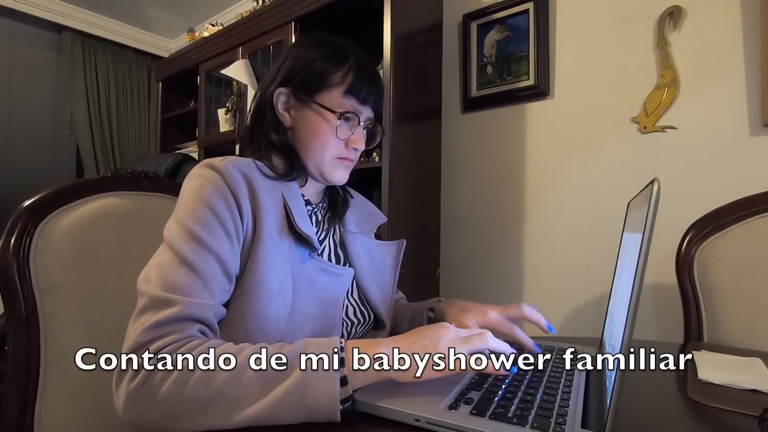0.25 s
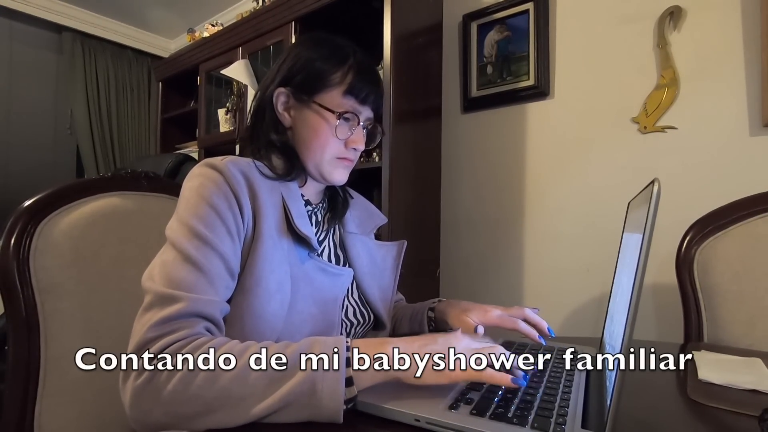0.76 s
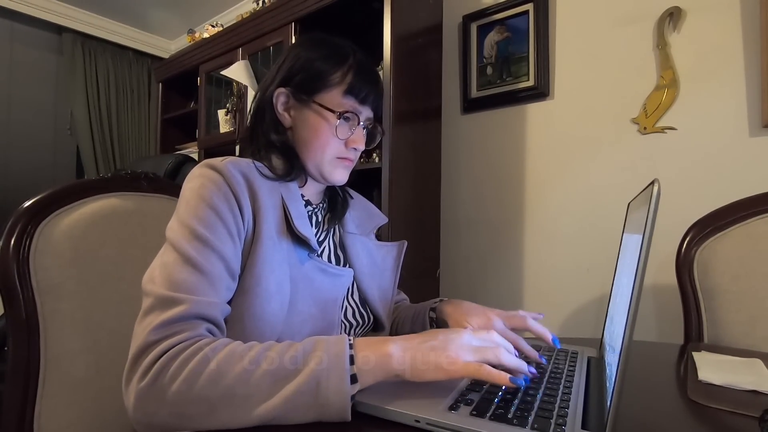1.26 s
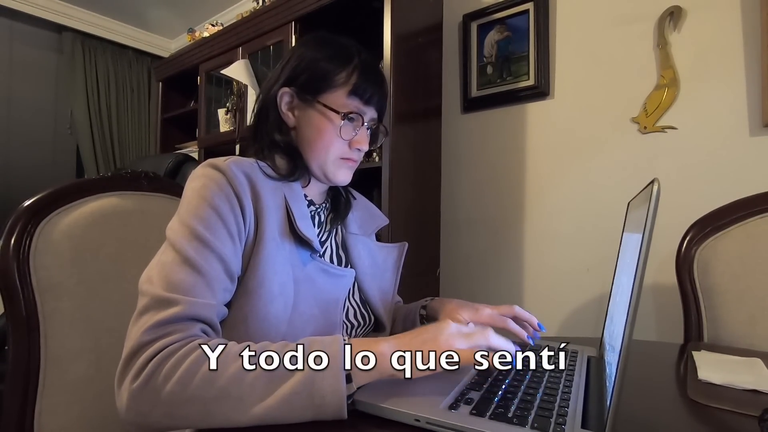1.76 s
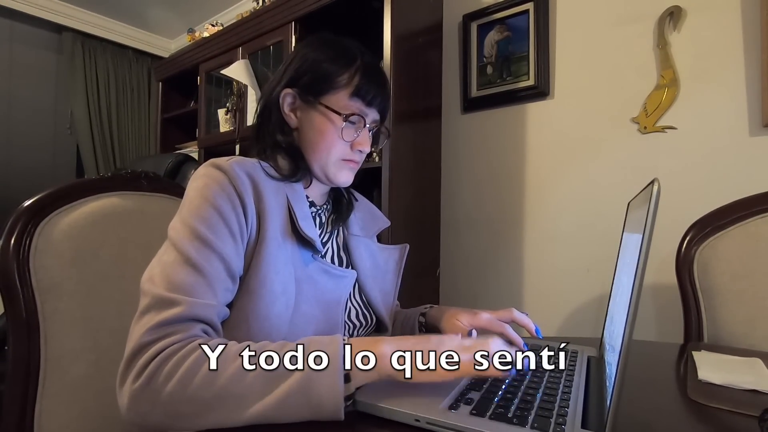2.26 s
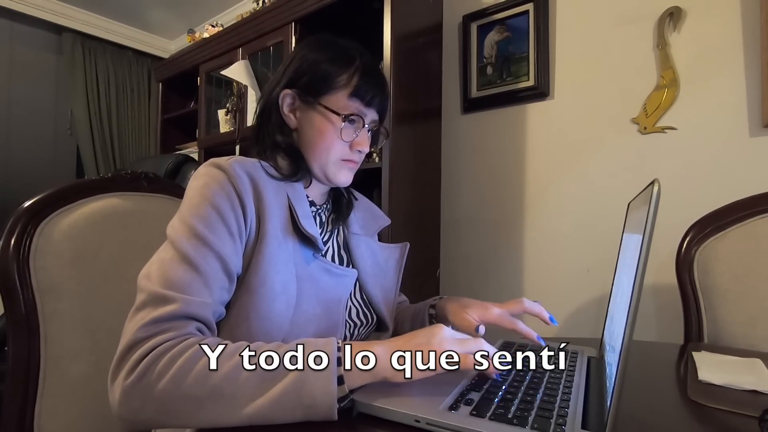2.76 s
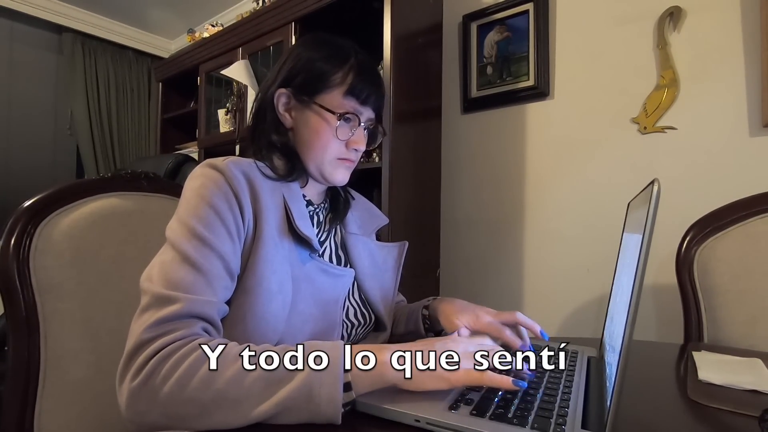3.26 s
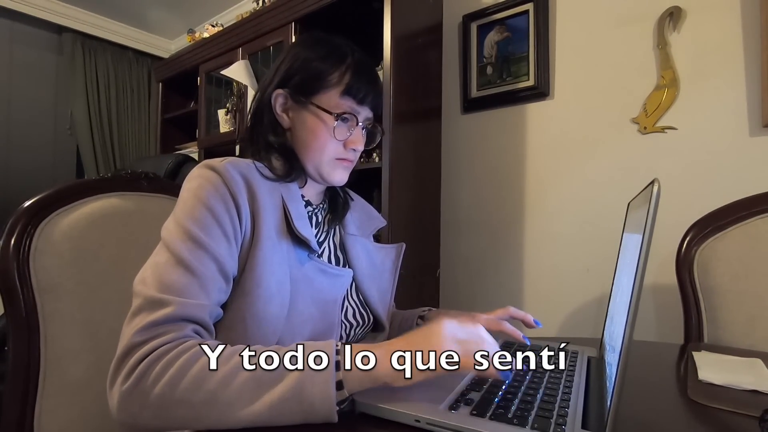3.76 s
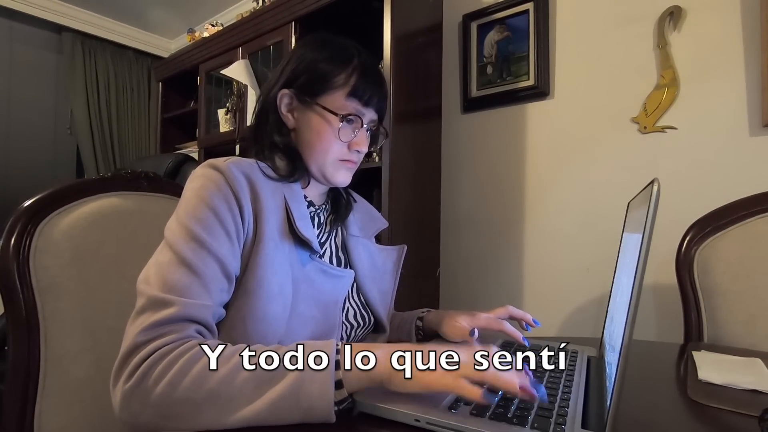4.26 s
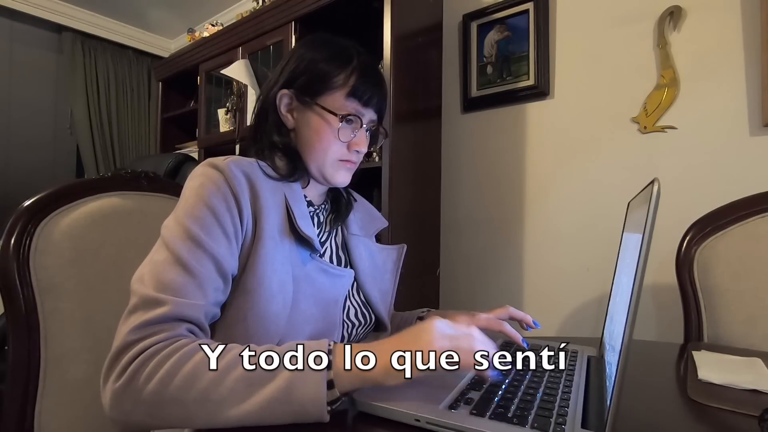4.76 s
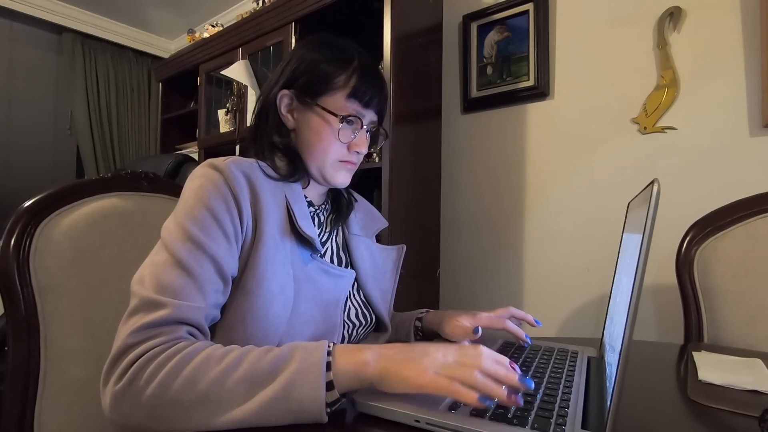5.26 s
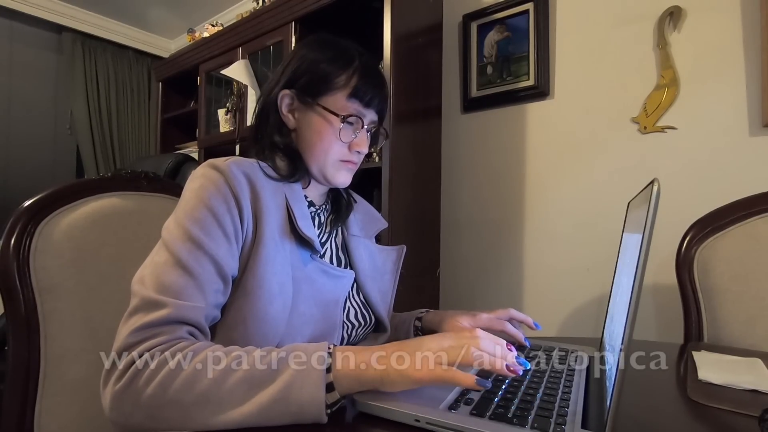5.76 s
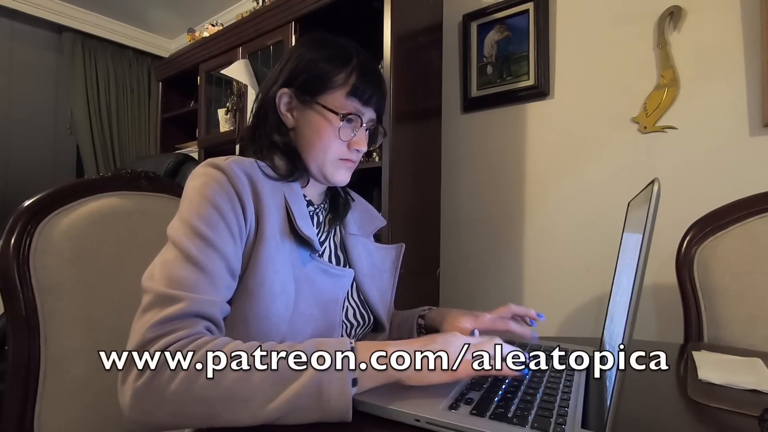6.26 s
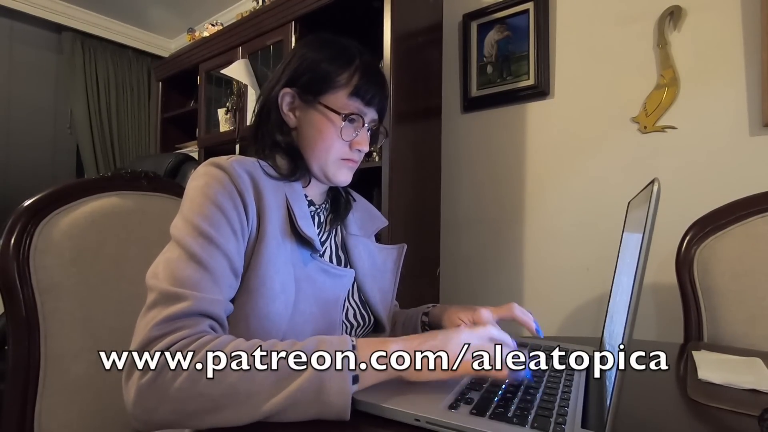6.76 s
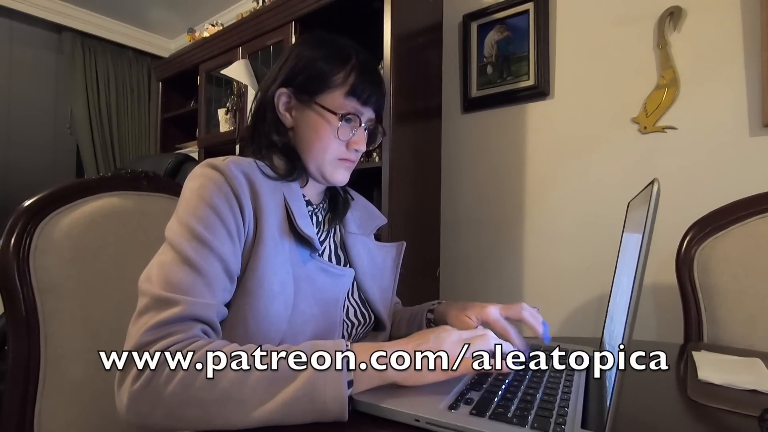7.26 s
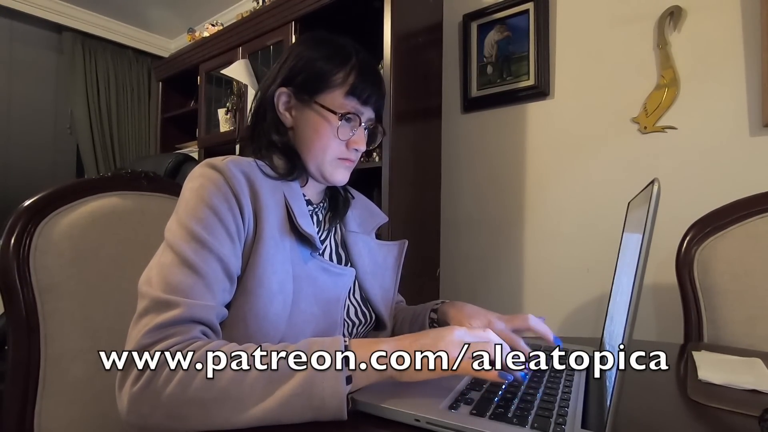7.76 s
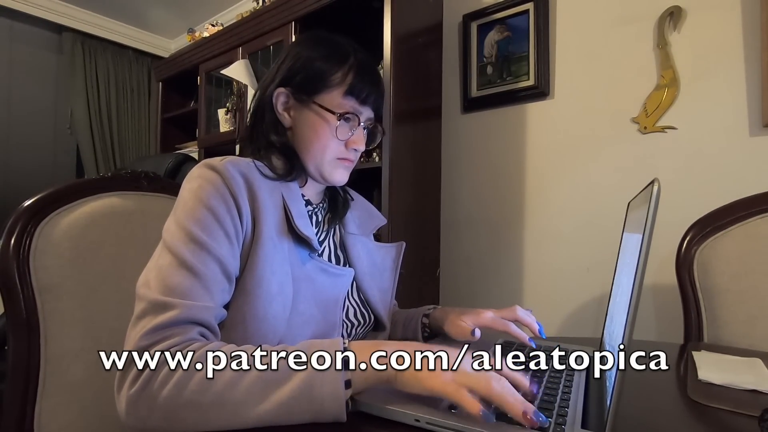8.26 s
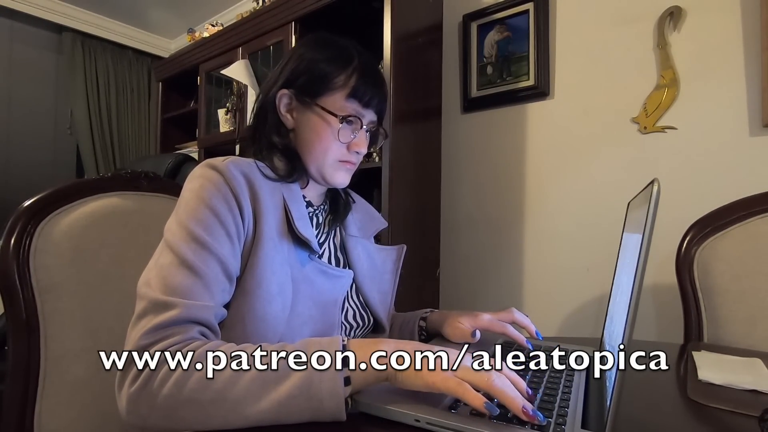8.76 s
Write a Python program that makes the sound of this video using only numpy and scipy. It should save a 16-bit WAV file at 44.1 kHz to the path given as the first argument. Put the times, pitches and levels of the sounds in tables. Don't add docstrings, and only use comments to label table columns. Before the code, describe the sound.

Quick, light typing on a laptop in a quiet furnished room, crisp key ticks with soft table thumps and a faint low hum.

```python
import sys
import numpy as np
from scipy import signal
from scipy.fft import rfft, irfft, next_fast_len
from scipy.io import wavfile
from scipy.ndimage import uniform_filter1d

SR = 44100
rng = np.random.default_rng(int(sys.argv[2]) if len(sys.argv) > 2 else 0)


def magnitude_from_level(level_db):
    exponent = np.asarray(level_db, float) / 20
    return 10 ** exponent


def unload_wav(signal):
    wavfile.write(
        sys.argv[1],
        SR,
        np.round(np.clip(np.atleast_2d(signal).T, -1, 1) * 32767).astype(np.int16),
    )


N = 397341

# (frequency [Hz], width [Hz], level [dB])
TICK = [(6681, 3300, -1.5), (8300, 1600, 17.5), (9300, 2070, 2), (11980, 1900, 6.5)]
# (frequency [Hz], width [Hz], level [dB])
CAP = [(2190, 700, -15), (3050, 1200, -9), (4760, 2180, -11), (4900, 1700, -8.5), (5640, 1870, -2.5)]
# (frequency [Hz], left-right likeness [-1 to 1])
SAME = [(100, 0.43), (500, 0.16), (2000, 0.17), (8000, 0.18)]


def evened(x):
    return x / np.sqrt(np.mean(x ** 2) + 1e-20)


def read(points, hz):
    f, value = np.transpose(points)
    return np.interp(np.log(hz + 1), np.log(f + 1), value)


def add(mix, s, sound):
    part = mix[..., round(s * SR):][..., :sound.shape[-1]]
    part += sound[..., :part.shape[-1]]


def strike(modes, chance, blow_s, detune, spread_db, size=3000):
    t = np.arange(size) / SR
    hz, width, db = np.transpose(modes)[:, :, None]
    louder, sharper = chance[:2, :len(modes), None]
    level = magnitude_from_level(db + spread_db * louder) * np.exp(-np.pi * width * t)
    ring = (level * np.sin(2 * np.pi * hz * (1 + detune * sharper) * t)).sum(0)
    ring = ring * (1 - np.exp(-t / blow_s))
    return ring / abs(ring).max()


def noise(spectrum, same, patchy_db, size):
    frames, hz = 4 * N // size + 5, np.fft.rfftfreq(size, 1 / SR)
    a, b, c, d, patches = rng.standard_normal((frames, len(hz), 5)).T
    patches = uniform_filter1d(patches, size=8, axis=0)
    patches = evened(uniform_filter1d(patches, size=10, axis=1))
    same = np.clip(read(same, hz), -1, 1)[:, None]
    left, other = a + 1j * b, c + 1j * d
    z = np.array([left, same * left + np.sqrt(1 - same ** 2) * other])
    z = z * magnitude_from_level(read(spectrum, hz)[:, None] + patchy_db * patches)
    return evened(signal.istft(z, nperseg=size, noverlap=3 * size // 4)[1][:, :N])


def strokes():
    # (time [s], tick peak [dB], case knock re tick [dB])
    crisp = [(0.4129, -29, -30), (0.8286, -32, -11), (.9532, -32, -22.5), (1.4307, -36.5, -38),
             (1.6048, -38, -17.5), (2.3178, -33.5, -10.5), (2.5332, -31.5, -18), (2.7601, -37.5, -8.5),
             (3.2333, -29.5, -22), (3.3778, -31.5, -19), (6.3576, -34, -22.5), (6.6026, -34.5, -20.5),
             (6.7981, -35, -23.5), (7.0326, -34.5, -24), (7.246, -32, -29), (7.4063, -36, -23),
             (7.4546, -28.5, -27), (7.6044, -31.5, -27.5), (7.6757, -30, -21.5), (7.822, -40, -16.5)]
    # (tick [Hz], cap [Hz], case [Hz], cap rattle re tick [dB])
    crisp_voice = [(7600, 5390, 1270, -19), (8100, 5280, 850, -26), (9000, 4980, 837, -26),
                   (8400, 5880, 900, -26), (9000, 5290, 845, -24), (8600, 4160, 869, -20),
                   (8300, 5490, 991, -22), (7400, 4530, 900, -18), (8100, 5510, 1210, -28),
                   (8700, 5870, 966, -28), (8200, 4980, 880, -24), (8400, 5250, 756, -28),
                   (7700, 5520, 980, -26), (7600, 4780, 883, -28), (7800, 4840, 875, -28),
                   (7900, 5670, 1380, -26), (8800, 5050, 1110, -22), (7300, 5960, 937, -22),
                   (7200, 4910, 980, -28), (7700, 5190, 1290, -26)]
    # (time [s], tick peak [dB], cap rattle re tick [dB], case knock re tick [dB])
    loose = [(.001, -42, -16, -10), (.1211, -41, -11.5, -8.5), (0.1888, -35, -20.5, -32),
             (0.3447, -36.5, -22, -24.5), (1.26, -40.5, -16.5, -20), (1.731, -37, -19, -12.5),
             (2.6743, -33.5, -19, -14.5), (2.873, -34, -20, -20), (2.9236, -33, -8.5, -15),
             (3.0147, -42, -6, -16), (3.0604, -40, -10.5, -8), (3.5096, -34.5, -20.5, -20.5),
             (3.9007, -41.5, -16.5, -12), (4.0884, -33, -10, -12.5), (5.1124, -33.5, -10, -16),
             (5.1888, -43.5, -9.5, -10), (5.2953, -39, -19.5, -29), (5.9669, -39, -19.5, -27),
             (6.4413, -33, -19.5, -25.5), (6.5126, -40.5, -12, -12), (7.1643, -28.5, -16.5, -20.5),
             (7.5414, -40.5, -10, -12)]
    # (tick [Hz], cap [Hz], case [Hz])
    loose_voice = [(7700, 5860, 1090), (8000, 4600, 985), (7980, 3980, 999), (9160, 4920, 845),
                   (7930, 5760, 869), (8830, 5250, 834), (7200, 4520, 900), (8800, 4470, 1380),
                   (7000, 5400, 1560), (7230, 5300, 1200), (8020, 3200, 1430), (7960, 5820, 867),
                   (7680, 4640, 1290), (8200, 4900, 982), (7370, 5380, 1150), (7450, 5640, 845),
                   (7000, 5610, 832), (8280, 5170, 1610), (7490, 5390, 1340), (8600, 4690, 848),
                   (8800, 4800, 988), (7130, 4830, 856)]
    # (time [s], tick peak [dB], case knock re tick [dB], table thump re tick [dB])
    bar = [
        (0.53, -44.5, 1, 7),
        (2.136, -47.5, -3.5, 7),
        (4.3683, -45.5, -7.5, -3.5),
        (5.458, -38, -4.5, 3.5),
        (6.1446, -52, 6, 4),
        (8.316, -53, 0, 11),
    ]
    # (tick [Hz], cap [Hz], case [Hz], cap rattle re tick [dB])
    bar_voice = [(7400, 4800, 860, -8), (7910, 3800, 1130, -9), (7780, 5060, 1090, -15),
                 (7400, 4510, 1090, -6), (8590, 5400, 1380, -8), (8000, 3360, 1470, -5)]
    # (time [s], tick peak [dB], cap rattle re tick [dB], case knock re tick [dB])
    light = [(0.0923, -48, -12.5, -24), (0.4871, -47, -11, -10), (.6589, -51, -16, -9),
             (1.039, -56.5, -12, -1.5), (1.1733, -54.5, -8.5, -11), (1.48, -53.5, -39, -30),
             (2.4017, -58, -16.5, -15), (2.6081, -52, -21, -6.5), (2.7984, -47, -14.5, -13),
             (3.139, -52.5, -15.5, -5.5), (3.2007, -57.5, -14, 7.5), (3.6254, -52.5, -16, -8.5),
             (3.6773, -61, -32, -3.5), (3.764, -65, -12.5, -16.5), (4.1864, -46.5, -11, -10),
             (4.6174, -63, -8.5, -5), (4.7246, -59, -13.5, -13), (4.7459, -64, -10.5, -10),
             (4.8579, -45.5, -14, -21), (5.3213, -54, -2.5, -2), (6.231, -51.5, -11, -11),
             (6.6988, -58, -8, 5), (6.885, -56, -22, -10), (6.921, -53.5, -10, 6),
             (7.3327, -56.5, -17, -22), (7.9462, -51.5, -42, -18.5), (8.0672, -64.5, -14, -11.5)]
    crisp_thump_db, loose_thump_db, light_thump_db = 0.2, -0.35, 3
    rows = [(s, db, *voice, case, case + crisp_thump_db)
            for (s, db, case), voice in zip(crisp, crisp_voice)]
    rows += [(s, db, *voice, cap, case, case + loose_thump_db)
             for (s, db, cap, case), voice in zip(loose, loose_voice)]
    rows += [(s, db, *voice, case, table) for (s, db, case, table), voice in zip(bar, bar_voice)]
    scatter = np.exp(.1 * rng.standard_normal((len(light), 2)))
    rows += [(s, db, 7600 * a, 4900 * b, 0, cap, case, case + light_thump_db)
             for (s, db, cap, case), (a, b) in zip(light, scatter)]
    return rows


def clicks(rows):
    cap_ring_db, cap_ring_width_hz = -5, 1100
    rattle_db, rattle_s = -11, .007
    landing_s = .0011
    air, blurred = np.zeros((2, N))
    chance = rng.standard_normal((len(rows), 2, 2, 12))
    grit, sparse = rng.standard_normal((len(rows), 2, 1600)), rng.random((len(rows), 2, 1600))
    t = (np.arange(1600) - 400) / SR
    snap = magnitude_from_level(-12) * np.exp(-abs(t) / .001)
    for (s, db, hz, cap_hz, _, cap_db, _, _), c, g, u in zip(rows, chance, grit, sparse):
        tick_modes = TICK * np.array([hz / TICK[1][0], 1, 1])
        tick = strike(tick_modes, c[0], .00005, 0.003, 1.9, size=200)
        cap_modes = CAP + [(cap_hz, cap_ring_width_hz, cap_ring_db)]
        cap = magnitude_from_level(cap_db + 7.5) * strike(cap_modes, c[1], .0001, 0.03, 1.5, size=200)
        soft = np.clip((-39.0 - db) / 9, 0, 1)
        going_down = magnitude_from_level(-33 + 12 * soft) * np.exp(t / 0.011)
        settling = magnitude_from_level(-14.5) * np.exp(-t / 0.0038) + soft * magnitude_from_level(-11) * np.exp(-t / .016)
        chatter = (snap + np.where(t < 0, going_down, settling)) * g * (u < .08)
        chatter[1] += (t > 0) * magnitude_from_level(rattle_db) * np.exp(-t / rattle_s) * g[1] * (u[1] > .85)
        chatter[:, np.argmin(abs(t))] = (1 - .6 * soft) * np.array([1, .6])
        click = np.convolve(tick, chatter[0]) + np.convolve(cap, chatter[1])
        start = s + landing_s + t[0]
        add(air, max(start, 0), magnitude_from_level(db + 1.0) * click[round(max(-start, 0) * SR):])
        weight = np.linalg.norm(chatter, axis=1)
        add(blurred, s + landing_s, magnitude_from_level(db - .2) * (weight[0] * tick + weight[1] * cap))
    return air, blurred


def blows(rows):
    # (frequency [Hz], width [Hz], level [dB])
    case_modes = [(657, 93, -7), (743.41, 70, -8), (850, 67, -2), (916, 59.5, -2.5), (1014.3, 70.4, 0),
                  (1097, 73, -3), (1251, 74.69, -4), (1483.1, 85, -7), (1534, 80, -9), (1960, 450, -13)]
    # (frequency [Hz], width [Hz], level [dB])
    table_modes = [(98, 30, -5), (127, 44, -7), (195.76, 25.3, 3), (283, 49, 0.5), (332.3, 16.7, -4.5),
                   (469.03, 200, 2), (600, 280, -17.5)]
    # (frequency [Hz], width [Hz], level [dB])
    slap_modes = [(600, 300, -5), (1300, 700, -1), (2000, 800, 0), (2900, 1200, 0)]
    # (time [s], case knock peak [dB],
    # table thump re knock [dB])
    dull = [(0.057, -72, 7), (1.282, -64, 12), (1.779, -63, -1), (2.029, -87, 17.5), (2.369, -63, -2),
            (4.12, -58, -1), (4.519, -76, 12), (4.563, -64, 6), (4.659, -68, -3), (4.882, -54, -12.5),
            (5.489, -56.5, 5), (5.739, -83, 5.5), (5.858, -78.5, 4), (5.994, -62, -5), (6.82, -64, -3),
            (.24, -62, -5), (2.768, -52, -10), (6.169, -60, 17.5), (6.252, -50.5, -7), (6.748, -69.5, 20.5),
            (7.276, -56, -1), (7.746, -64, 4.5), (8.538, -79, 6),
            (.533, -45, -2),
        (2.136, -59.5, 10.5),
        (4.368, -54.5, 9.5),
        (5.114, -52, 7),
        (8.316, -60.5, 3.5),
    ]
    knock_hz, knock_octaves, knock_wander = 890, .4, .4
    knocks, thumps = np.zeros((2, N))
    hits = [(s, db + case_db, db + table_db, case_hz) for s, db, _, _, case_hz, _, case_db, table_db in rows]
    hits += [(s, db, db + table_db, 0) for s, db, table_db in dull]
    chance = rng.standard_normal((len(hits), 3, 2, 12))
    for (s, case_db, table_db, case_hz), c in zip(hits, chance):
        lightness = np.clip((-44.5 - case_db) / 8, 0, 1)
        centre = case_hz or knock_hz * np.exp(knock_wander * abs(c[0, 0, -1]) * lightness)
        rung = [(f, w, d - min(6 * (np.log2(f / centre) / knock_octaves) ** 2, 8)) for f, w, d in case_modes]
        add(knocks, s + .002, magnitude_from_level(case_db + 1.0) * strike(rung, c[1], 0.0035, .015, 4, size=1600))
        add(knocks, s + .0011, magnitude_from_level(case_db - 2.5) * strike(slap_modes, c[0], .0002, .12, 2.5, size=300))
        thump = strike(table_modes, c[2], 0.001, 0.044, 2.1, size=1600)
        add(thumps, s, magnitude_from_level(1.4 * (table_db + 46.0) - 46.5) * thump)
    return knocks, thumps


def room(x, blurred):
    # (left [s], right [s])
    echo_s = [(.0070, .0069), (.0078, .0080), (.0093, .0094), (.0108, .0112), (.0163, .0167), (.0215, .022),
              (.031, .029)]
    # (left [dB], right [dB])
    echo_db = [(-7.5, -11), (-21.5, -1.5), (-5.5, -15.5), (-14.5, -16.5), (-44.5, -10.5), (-11.5, -24.5),
               (-18, -17)]
    # (frequency [Hz], time [s])
    fade = [(300, 0.37), (900, 0.34), (2500, 0.33), (6000, 0.26), (12000, 0.29)]
    early = np.zeros((2, 1500))
    for (left_s, right_s), db in zip(echo_s, echo_db):
        early[[0, 1], [round(left_s * SR), round(right_s * SR)]] = magnitude_from_level(np.array(db) + 2.5)
    out = signal.oaconvolve(x[None], early, axes=1)[:, :N]
    size = SR // 3
    slots = np.arange(300, size - 20, 12)
    for turn in range(2):
        taps = np.zeros((2, size))
        at = slots + rng.integers(0, 12, (2, len(slots)))
        np.put_along_axis(taps, at, rng.choice([-1., 1.], at.shape), 1)
        taps[1] = 0.26 * taps[0] + 0.85 * taps[1]
        hz, t, z = signal.stft(taps, SR, nperseg=128)
        decay = magnitude_from_level(-60 * t / read(fade, hz)[:, None])
        onset = np.clip((t - .008) / 0.0093, 0, 1)
        tail = signal.istft(z * decay * onset, SR, nperseg=128)[1]
        tail = tail / np.linalg.norm(tail[0])
        window = np.cos(np.pi * (np.arange(N) / SR * 3 + turn / 2))
        out += magnitude_from_level(-1.5) * signal.oaconvolve((blurred * window)[None], tail, axes=1)[:, :N]
    return out


def effort():
    # (time [s], level [dB])
    trembling = [(0, -42.5), (1.33, -44.5), (1.82, -44.5), (1.96, -74), (2.3, -72), (2.55, -43.5),
                 (3.45, -47.5), (4.15, -46.5), (4.4, -59), (5.09, -60.5), (5.2, -46.5), (5.8, -54),
                 (6.4, -47), (6.7, -54), (7.05, -42), (7.8, -43), (8.15, -53), (8.3, -77)]
    return np.interp(np.arange(N) / SR, *np.transpose(trembling))


def shake():
    # (peak time [s], level [dB], sway frequency [Hz], settling time per 20 dB [s])
    sways = [(.012, -38.4, 41.5, .39), (.602, -40.4, 55.5, .39), (1.062, -35, 56, .41),
             (1.782, -41.4, 50.5, .09), (2.202, -28.4, 47.5, .052), (2.372, -38.4, 38.5, .052),
             (2.622, -39.4, 36.5, .44), (3.102, -35.4, 44.5, .26), (3.302, -38.4, 68.5, .31),
             (3.542, -42.4, 63.5, .09), (3.682, -39.5, 48.2, .26), (4.202, -42.4, 37.5, .16),
             (4.422, -29.4, 46.5, .082), (4.672, -34.5, 48.4, .14), (5.342, -40.4, 60.5, 0),
             (5.512, -27.4, 57, .16), (6.022, -35, 66.5, .19), (6.192, -32.4, 66.4, 0.19),
             (6.502, -41.4, 62.5, .16), (6.802, -43.4, 55.4, .31), (6.962, -36.4, 64.4, .062),
             (8.372, -29.4, 52.5, .072), (8.562, -49.4, 50.4, .16)]
    # (frequency [Hz], level [dB per Hz])
    jolt_spectrum = [(12, -13.5), (25, 0), (50, 0.5), (75, -4.5), (95, -19), (140, -16), (300, -48),
                     (600, -97), (1000, -120)]
    rise_s, hold_s, gain_db = 0.052, .05, -3
    trembling = magnitude_from_level(2 * effort())
    t = np.arange(0, N, 32) / SR
    power = trembling[::32]
    for s, db, hz, settle_s in sways:
        rising, settling = (s - t) / rise_s, (t - s - hold_s) / min(settle_s, .5)
        fall = np.maximum(np.maximum(rising, settling), 0)
        power = power + magnitude_from_level(2 * (db + gain_db - 20 * fall))
    full_t = np.arange(N) / SR
    power = np.interp(full_t, t, power)
    db = 10 * np.log10(power)
    hz = np.interp(full_t, *np.transpose(sways)[::2])
    clean = np.clip((db + 50) / 15 - .25 * trembling / power, .05, .95)
    turn = 2 * np.pi * np.cumsum(hz) / SR
    sway = np.sqrt(2) * np.sin([turn - 1.9, turn]) * [[.7], [1]]
    jolts = noise(jolt_spectrum, [(20, 0.31), (200, 0.092)], 2.5, size=2048)
    return magnitude_from_level(db) * magnitude_from_level([[-10.3], [5]]) * (np.sqrt(clean) * sway + np.sqrt(1 - clean) * jolts)


def hum():
    # (frequency [Hz], level [dB per Hz])
    hum_spectrum = [(40, -23), (105, -23.5), (150, 6.5), (200, -3), (260, -13), (400, -20.5), (550, -28),
                    (1000, -31.5), (2200, -42.5), (5000, -46.5), (9000, -50), (11000, -60), (16000, -84)]
    # (frequency [Hz], level [dB rms])
    fan = [(625, -84), (685, -88), (1510, -93), (1600, -92)]
    follows, lag_s, fan_duck = 0.059, 0.54, .2
    t = np.arange(N) / SR
    swing = uniform_filter1d(effort(), round(lag_s * SR)) + 70
    tones = np.zeros(N)
    for hz, db in fan:
        waver = 4.5 * np.cumsum(rng.standard_normal(N)) / np.sqrt(SR)
        tones += magnitude_from_level(db) * np.sin(2 * np.pi * hz * t + waver)
    rumble = magnitude_from_level(-59 + follows * swing) * magnitude_from_level([[-1.5], [1.5]]) * noise(hum_spectrum, SAME, 2.8, size=1024)
    return rumble + np.sqrt(2) * tones * magnitude_from_level(-fan_duck * swing)


def street():
    # (frequency [Hz], level [dB per Hz])
    street_spectrum = [(300, -26.5), (500, -35), (800, 8), (1200, -1), (1700, 1.5), (2200, -9), (3500, -37),
                       (6000, -75)]
    # (time [s], level [dB])
    swells = [
        (0.0, -70),
        (0.6, -82.5),
        (1.88, -88.5),
        (3.09, -68.5),
        (3.94, -90),
        (4.52, -80),
        (5.9, -82),
        (6.3, -74),
        (9.01, -79.5),
    ]
    s, db = np.transpose(swells)
    return magnitude_from_level(np.interp(np.arange(N) / SR, s, db) + 2.5) * noise(street_spectrum, SAME, 3.4, size=512)


def rustles():
    # (middle time [s], length [s], level [dB])
    slides = [(.065, .06, -62), (.245, .04, -58), (.29, .05, -63), (2.21, .06, -61), (2.455, .015, -68),
              (3.45, .05, -63), (4.362, .014, -62), (4.488, .04, -68), (5.09, .03, -68), (5.815, .04, -74),
              (6.338, .02, -64), (7.908, .02, -70)]
    out, grain = np.zeros(N), rng.standard_normal((len(slides), 2, 3000))
    chance = rng.standard_normal((len(slides), 2, 12))
    for (s, length, db), g, c in zip(slides, grain, chance):
        size = min(round(length * SR), 3000)
        colour = strike(TICK, c, .00005, .05, 3, size=200)
        colour = colour + magnitude_from_level(-3) * strike(CAP, c, .0001, .07, 3, size=200)
        grit = g[0] * (g[1] > .9)
        slip = evened(np.convolve(grit, colour))[:size] * np.hanning(size)
        add(out, s - length / 2, magnitude_from_level(db - 4.5) * slip)
    return out


def scene():
    rows = strokes()
    air, blurred = clicks(rows)
    knocks, thumps = blows(rows)
    slides = rustles()
    air, blurred = air + slides, blurred + slides
    body = magnitude_from_level(-2.0) * knocks + magnitude_from_level(-4.5) * thumps
    heard = air + room(air + body, blurred + body)
    heard = heard + knocks * magnitude_from_level([[-3.5], [3]]) + thumps * magnitude_from_level([[-3], [2.5]])
    return heard + shake() + hum() + street()


def band_limit(x):
    return signal.sosfilt(signal.butter(12, 16300, fs=SR, output="sos"), x)


def record(dry):
    # (frequency [Hz], level [dB])
    mic = [(9800, 1.5), (11500, -2.5), (14000, -11.5), (16000, -11), (20000, -41)]
    size = next_fast_len(N)
    hz = np.fft.rfftfreq(size, 1 / SR)
    dulled = irfft(rfft(dry, size) * magnitude_from_level(read(mic, hz)), size)[:, :N]
    late = np.array([dulled[0], np.roll(dulled[1], 1)])
    return band_limit(late)


dry = scene()
out = record(dry)
unload_wav(out)
```